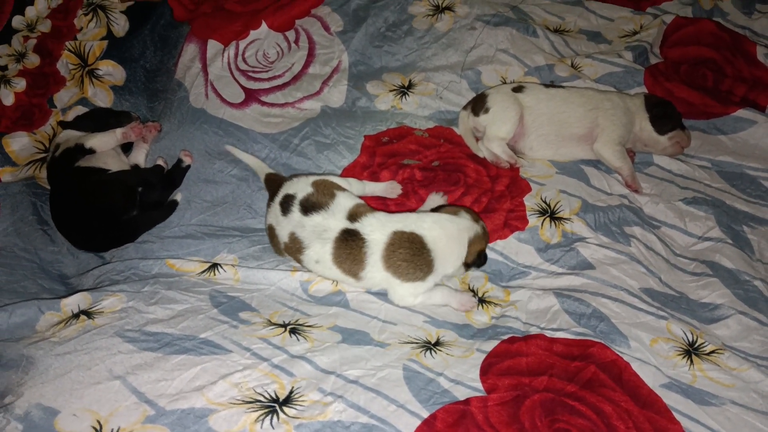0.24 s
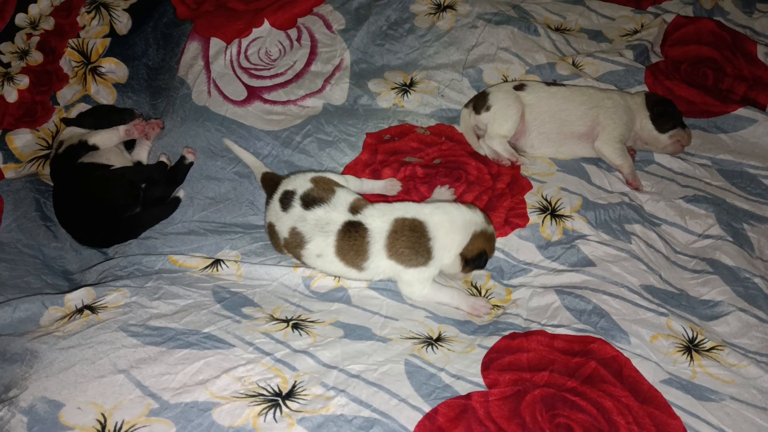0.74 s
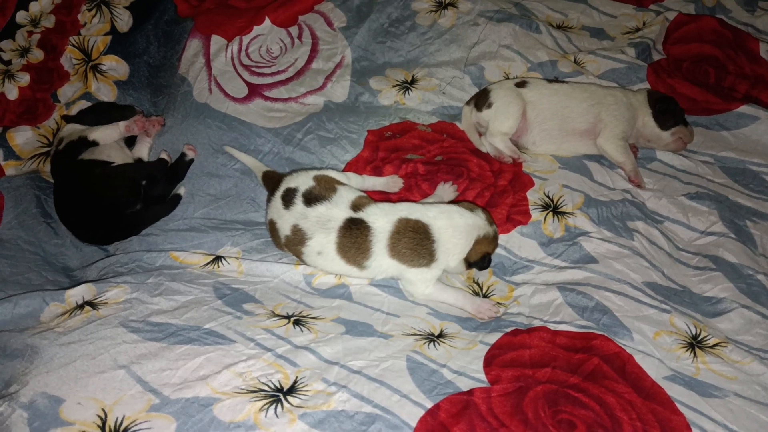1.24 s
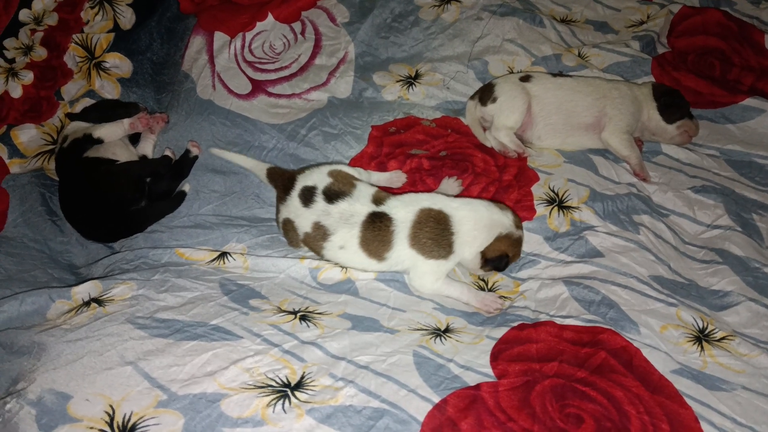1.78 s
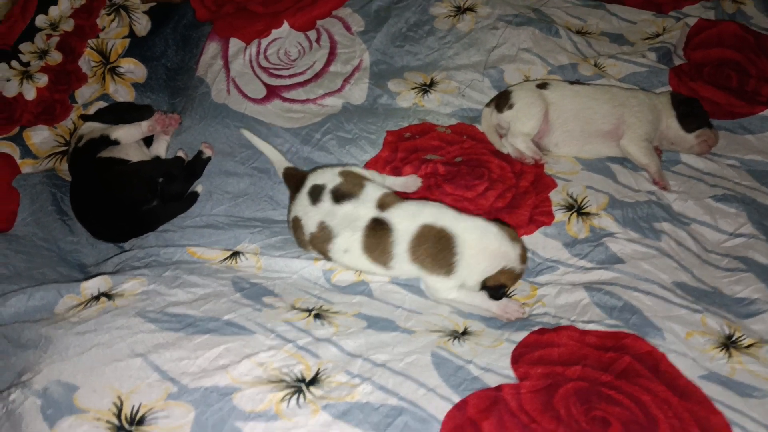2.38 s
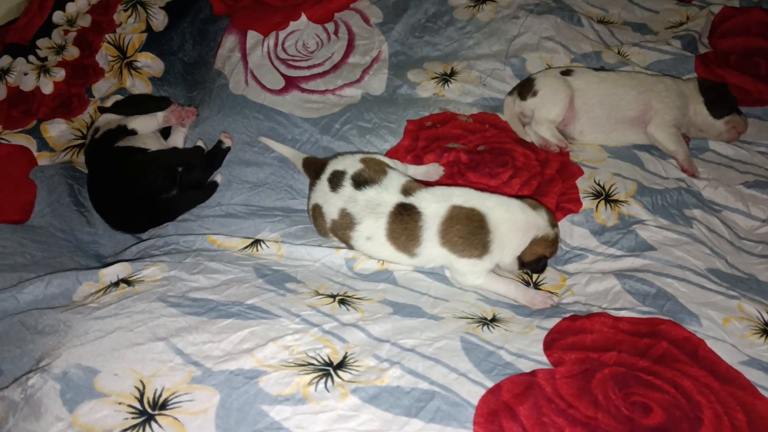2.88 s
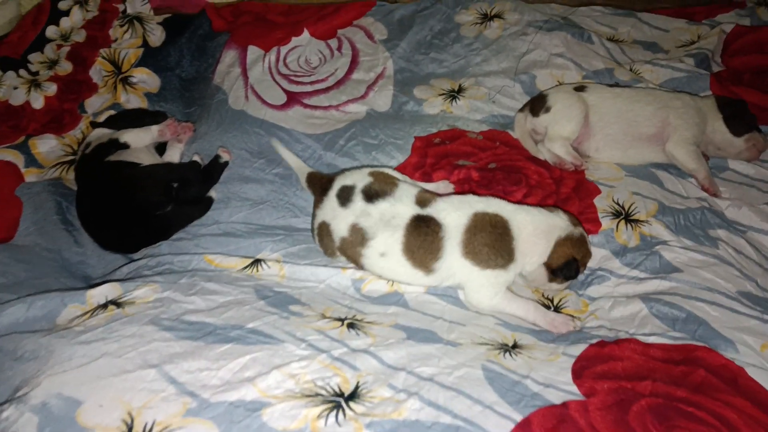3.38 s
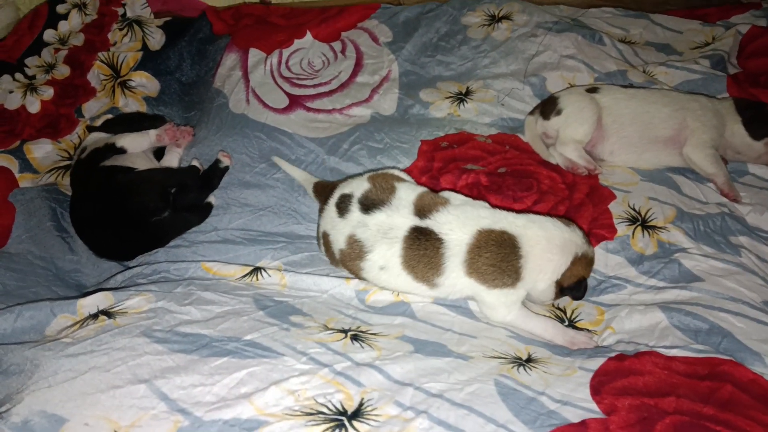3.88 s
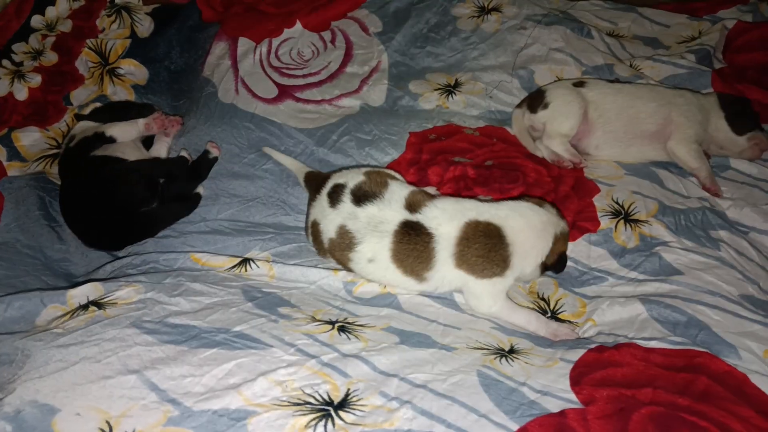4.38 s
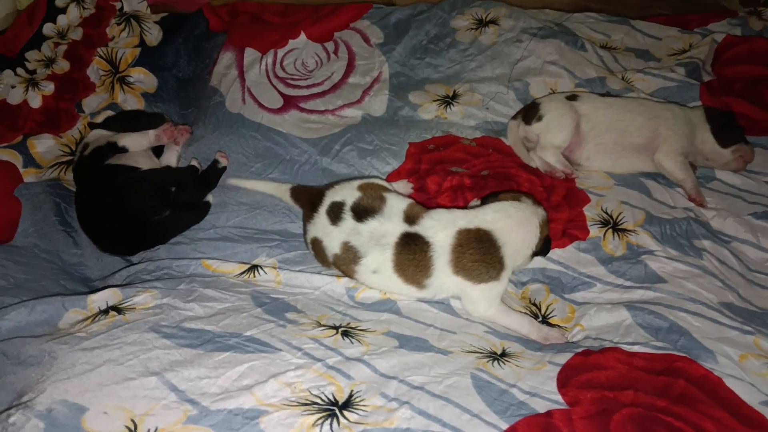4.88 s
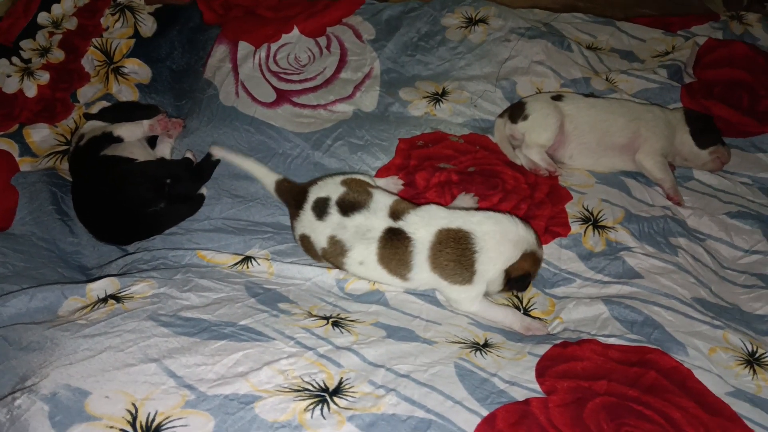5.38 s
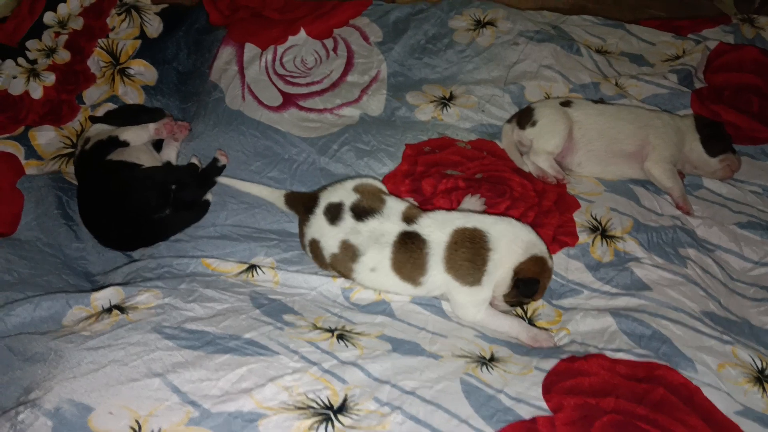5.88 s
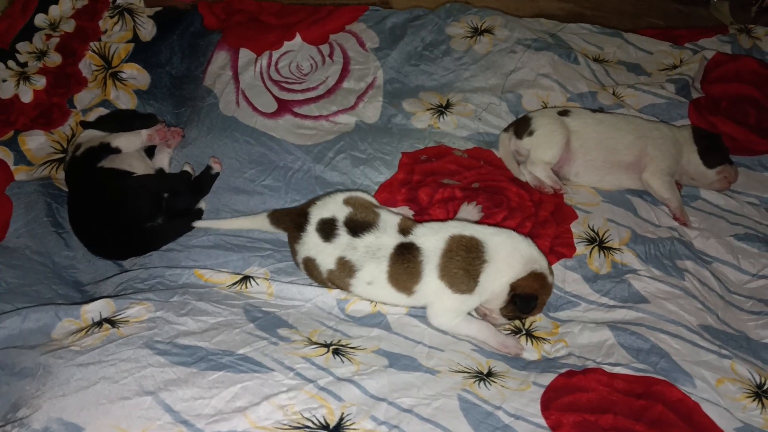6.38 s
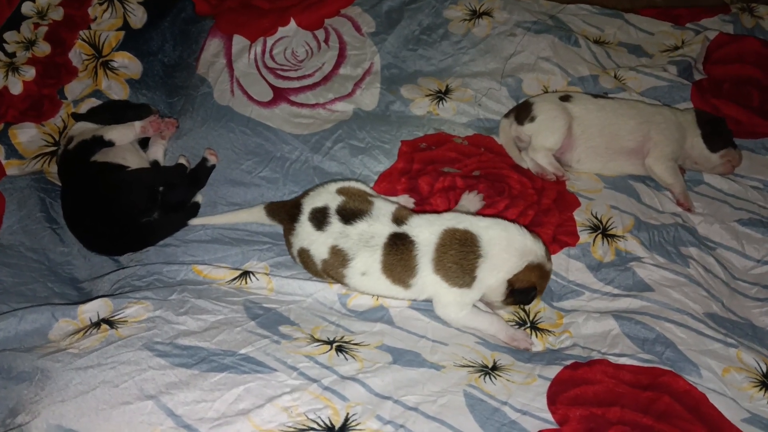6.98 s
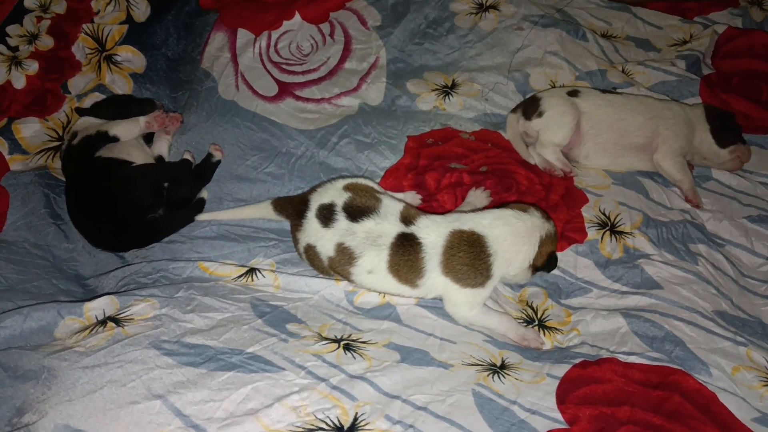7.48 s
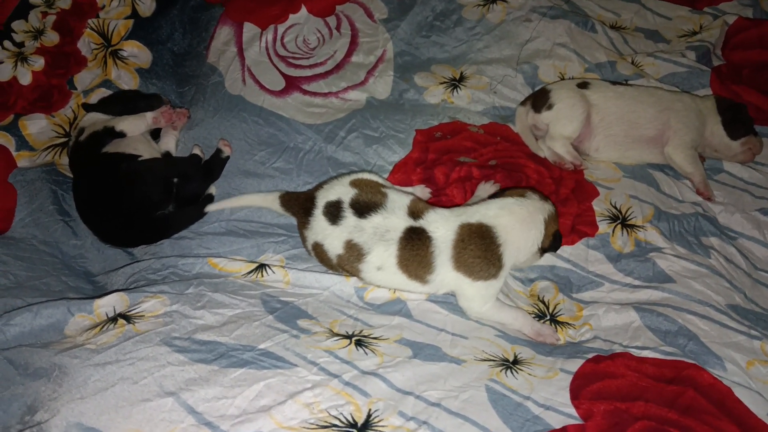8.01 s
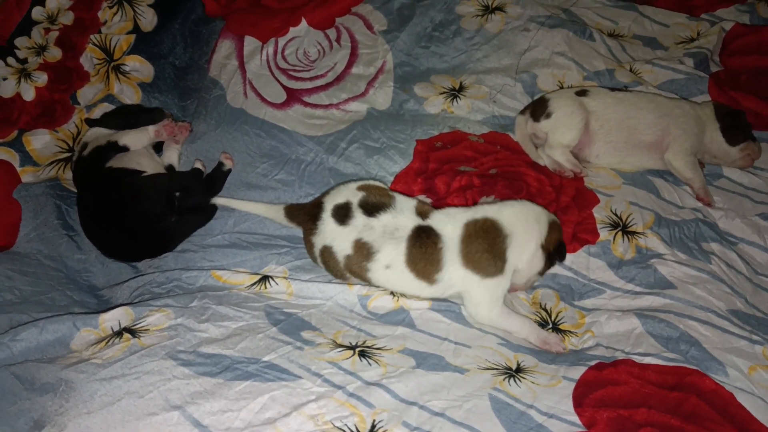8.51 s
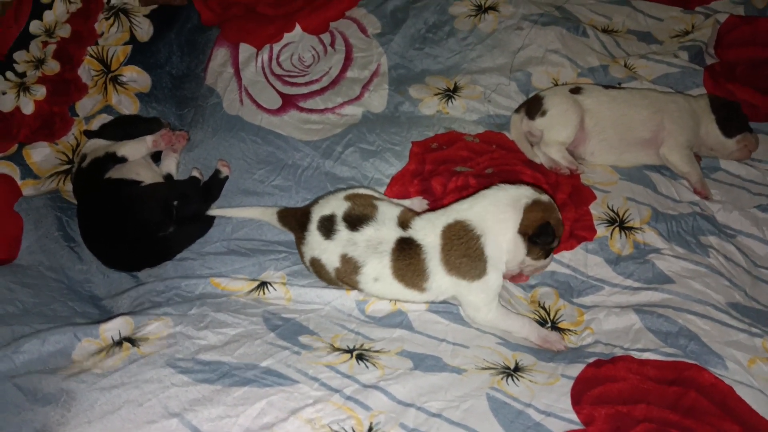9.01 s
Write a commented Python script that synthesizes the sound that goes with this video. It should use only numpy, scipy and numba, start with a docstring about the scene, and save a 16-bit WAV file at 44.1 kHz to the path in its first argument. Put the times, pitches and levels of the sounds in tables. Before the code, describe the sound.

Close up in a quiet room, a newborn puppy whimpers in thin, gliding squeaks that flip suddenly higher. Early on it grunts and sneezes softly, pauses, then cries almost continually with small gaps. Bed sheets hiss and snap faintly, the mattress thuds softly, and a wall clock rattles once a second farther off. The last half second becomes a hoarse, rough cry. Near stereo microphone, short room echo.

```python
"""A newborn puppy, near a two-port microphone, crawls on a bed in a quiet room and whimpers: gliding sine partials
that jump between registers, one sneeze of shaped noise, and at last a hoarse cry of uneven slaps ringing in the mouth.
Farther off a wall clock ticks, a rattle in its case. Around the puppy the sheet hisses and snaps and
the mattress thuds softly, both made of filtered noise and clicks over steady room tone."""
import sys
import numpy as np
from scipy import signal
from scipy.fft import rfft, irfft, next_fast_len
from scipy.io import wavfile
from scipy.ndimage import uniform_filter1d
from numba import njit

SR = 44100
rng = np.random.default_rng(int(sys.argv[2]) if len(sys.argv) > 2 else 0)


def persist_wave(psi):
    """Save psi, clipped to +-1, as 16-bit WAV."""
    counts = np.round(np.clip(psi, -1, 1) * 32767).astype(np.int16)
    wavfile.write(sys.argv[1], SR, np.atleast_2d(counts).T)


N = 407925

# Levels hold before a sound is placed; the colours of hiss and voice are relative.
# Air of the room. Each row: frequency in Hz, colour in dB per Hz.
ROOM_AIR = [(18, -48.5), (30, -7), (125, 0), (388, -10), (803, -16), (1090, -11), (2090, -20), (2420, -16),
            (3810, -29), (5690, -20), (6610, -35.5), (7690, -29), (10800, -26.5), (12100, -38.5),
            (15700, -63.5), (22000, -120)]
ROOM_AIR_DB = -78
# Faint steady bands in the air. Each row: centre in Hz, width of each of two passes in Hz, level in dB.
AIR_WHISTLES = [(2490, 88, -94), (5755, 220, -86), (7520, 400, -93)]
# Whimpered notes; where two touch, the voice jumps between registers.
# Each note has rows: time in seconds, pitch in Hz, level in dB, mouth opening 0-1.
NOTES = [
    [(0.033, 680, -52.5, 0.36), (0.055, 690, -45, 0), (0.072, 898, -38.5, 0), (0.095, 920, -35, 0.44),
     (0.119, 1010, -40, 0.37), (0.135, 1203, -42.5, 0.4)],
    [(0.139, 1695, -43.5, 0.43), (0.2, 1750, -46.5, 0.56), (0.25, 1758, -49.5, 0.48),
     (0.29, 1750, -45, 0.5), (0.35, 1673, -46.5, .3), (0.39, 1750, -51, 0.21), (0.436, 1659, -42.5, 0.17),
     (0.481, 1631, -45, 0.17), (0.495, 1534, -48, 0)],
    [(0.742, 298.6, -57, 0), (0.755, 330, -52, 0.07), (0.766, 452, -38.5, 0.32), (0.782, 579, -35.5, 0.37),
     (0.787, 490, -39.5, 0.4), (0.792, 461, -34, 0), (0.803, 480, -67, 0)],
    [(1.683, 736, -55.5, 0.36), (1.711, 628, -43, 0.26), (1.74, 859, -36.5, 0.17), (1.765, 834, -37, 0.17),
     (1.803, 631, -41.5, 0.2), (1.831, 525, -45, 0.47), (1.9, 600, -42.5, 0.3), (1.925, 661, -41, 0.22),
     (1.945, 716, -37.5, 0.42), (1.993, 732, -44, 0.33), (2.02, 658, -47, 0)],
    [(2.205, 534, -52, 0.7), (2.227, 557, -44.5, 0), (2.27, 914, -37.5, 0.22), (2.3, 897, -29.5, 0.39),
     (2.32, 885, -34.5, 0.2), (2.34, 740, -40.5, 0.67), (2.375, 571, -43.5, 0.45), (2.39, 387, -49, 0.2)],
    [(2.612, 795, -62, 0), (2.637, 739, -51.5, 0), (2.675, 1003, -43.5, 0.29), (2.706, 1184, -49.5, 0.45)],
    [(2.71, 1475, -44, 0.4), (2.774, 1630, -44.5, 0.5), (2.81, 1656, -42, 0.35), (2.84, 1607, -45, 0.48),
     (2.9, 1617, -39.5, 0.45), (2.948, 1505, -37.5, 0.36), (3.002, 1555, -38, 0.42), (3.02, 1327, -43.5, 0)],
    [(3.268, 602, -55, 0.16), (3.288, 661, -38.5, 0.11), (3.356, 887, -31.5, 0.1), (3.4, 915, -34, 0.59),
     (3.461, 1100, -37.5, 0.58), (3.505, 1168, -36.5, 0.77), (3.528, 1297, -28, 0.25)],
    [(3.532, 1680, -35, 0.83), (3.577, 1683, -27.5, 0.67), (3.605, 1686, -45.5, 1), (3.63, 1654, -50, 0.9),
     (3.655, 1664, -36.5, 0.6), (3.69, 1693, -41, 0.64), (3.715, 1667, -38, 0.6),
     (3.733, 1536, -40.5, 0.68), (3.773, 1620, -55, 0.8)],
    [(3.777, 853, -42, 0.12), (3.787, 818, -32.5, 0.17), (3.81, 810, -85, 0.5)],
    [(4.007, 670, -57.5, 0), (4.048, 578, -36, 0), (4.09, 880, -40.5, 0.05), (4.147, 985, -43.5, 0.32),
     (4.205, 1061, -42.5, 0.55), (4.228, 1144, -37.5, 0.33)],
    [(4.232, 1474, -41, 0), (4.28, 1518, -42, 0.3)],
    [(4.284, 896, -42, 0.5), (4.31, 708, -48, 0.04)],
    [(4.52, 581, -72, 0.16), (4.566, 760, -42, 0.22), (4.59, 938, -37, 0.32), (4.63, 899, -39, 0.23),
     (4.665, 829, -40.5, 0.28), (4.689, 759.5, -41.5, 0.55), (4.712, 590.5, -44.5, 0.66),
     (4.726, 515, -47.5, 0.87)],
    [(4.965, 413, -58, 0), (4.991, 480, -39, 0.25), (5.041, 940, -28, 0.07), (5.06, 983, -30.5, 0.39),
     (5.093, 863, -28.5, 0), (5.12, 827, -40.5, 0.48), (5.15, 740, -35.5, 0.32), (5.163, 521, -38, 0.33),
     (5.2, 423.5, -37, 0.23), (5.238, 367, -42.5, 0), (5.255, 330, -38.5, 0.14)],
    [(5.44, 499.4, -41, 0.36), (5.478, 572, -37, 0.07), (5.495, 770, -39.5, 0.01), (5.502, 909, -26, 0.13),
     (5.54, 948, -30, 0.48), (5.591, 939, -39, 0.45), (5.615, 861, -34.5, 0.31), (5.645, 783, -39.5, 0.23),
     (5.715, 779, -46, 0.28)],
    [(5.735, 787.4, -39, 0.42), (5.791, 802.7, -40, 0.03), (5.815, 822, -39, 0.4)],
    [(6.038, 660, -58.5, 0.2), (6.06, 593, -44.5, 0), (6.098, 856, -35.5, 0.05), (6.15, 873, -37, 0.42),
     (6.19, 1105, -46, 0.26), (6.215, 998, -39.5, 0.35), (6.28, 989, -39.5, 0.29), (6.305, 1085, -49, 0.78),
     (6.345, 991, -35, 0.25), (6.37, 1054, -43.5, 0.4), (6.39, 1183, -37, 0.32)],
    [(6.394, 1730, -41.5, 0.08), (6.412, 1662, -40, 0.35), (6.562, 1529, -47.5, 0.8),
     (6.594, 1577, -37.5, 0.2)],
    [(6.599, 1165, -46, 0.01), (6.625, 724, -57, 0)],
    [(6.885, 844, -56, 0), (6.939, 1038, -40.5, 0), (6.975, 1036, -41, 0.3), (6.986, 1149, -39, 0.21)],
    [(6.99, 1512, -39.5, 0.36), (7.01, 1785, -46, 0.06), (7.04, 1642, -44.5, 0), (7.118, 1896, -41.5, 0.3),
     (7.196, 1941, -42.5, 0.04)],
    [(7.2, 1770, -43, 0.33), (7.236, 1662, -40, 0.25), (7.29, 1730, -41.5, 0.57),
     (7.325, 1788, -36.5, 0.34), (7.345, 1699, -39.5, 0.47), (7.421, 1685, -34.5, 0.48),
     (7.462, 1613, -39.5, 0.62)],
    [(7.466, 1450, -42, 0.01), (7.508, 1566, -45, 0.1), (7.578, 1583, -50.5, 0), (7.61, 1485, -37, 0.31)],
    [(7.619, 1613, -27, 0.62), (7.633, 1752, -31, 0.66), (7.673, 1760, -36.5, 0.68),
     (7.7, 1756, -37.5, 0.66), (7.735, 1740, -41.5, 0.6), (7.754, 1775, -31, 0.23)],
    [(7.758, 1530, -49.5, 0.53), (7.77, 1154, -47.5, 0.23), (7.778, 1070, -63, .2)],
    [(7.99, 872, -47.5, 0.08), (8.04, 951, -49, 0.77)],
    [(8.044, 1330, -42.5, 0.25), (8.07, 1712, -37, 0.4), (8.12, 1905, -38.5, 0), (8.184, 1867, -45, 0.02),
     (8.221, 1945, -43, 0.1)],
    [(8.225, 1705, -39.5, 0.32), (8.345, 1643, -40, 0.52), (8.392, 1759, -37, 0.77),
     (8.425, 1666, -37.5, 0.73), (8.452, 1637, -34.5, 0.75), (8.478, 1648, -42.5, 0.2),
     (8.564, 1606, -39, 0.35), (8.612, 1605, -41, 0.86)],
]
# How each note favours its overtones. Each row: second partial in dB, third in dB, higher ones in dB.
OVERTONES = [(-1.5, -7.5, -0.5), (7, -0.5, 9), (1, 1.5, 4), (0.5, 1, -5.5), (-1.5, 1.5, -4),
             (4.5, -2, -2.5), (-1.5, -2, 12.5), (-1, -1.5, 2), (1, 4.5, 1), (3.5, -3, 8), (9.5, 7, -12),
             (9, -2, -4), (2, -1, -1), (0, -3, -17), (-3, -4.5, 3), (-3, -1.5, -0.5), (-1, -4, 13.5),
             (3, -4, -9), (-3, -4.5, 4), (-9, 1, 4.5), (5, -2, 1), (1, 2.5, 0.5), (5, -18.5, -12),
             (22, -2, 6.5), (5.5, -13, 11), (7, -7, 3), (-3.5, -3, -4), (13.5, -8, 5), (7.5, -9.5, 11)]
# Closed mouth, heard through the nose. Each row: frequency in Hz, gain in dB.
NOSE = [(300, -15), (550, -8.5), (900, 9), (1200, 7.5), (1700, 2), (2200, -7), (2700, -31), (3400, -19.5),
        (4500, -52), (8000, -55), (12000, -74.5)]
# Open mouth. Each row: frequency in Hz, gain in dB before THROAT_SHARE.
THROAT = [(590, -24.5), (1000, -13), (2330, -6), (3800, -18.5), (4950, -9.5), (6460, -21.5), (7720, -2),
          (12100, -38.5), (15700, -74), (22000, -120)]
THROAT_SHARE = 0.17   # how strongly the open mouth colours the partials
RESONANCES_RISE = 0.49   # share by which the nose resonances climb as the mouth opens fully
FALL_CLOSED_DB, FALL_OPEN_DB = -9.5, -1   # from one partial to the next
WIDE_HZ, WIDE_WIDTH_HZ, WIDE_DB = 5060, 210, 20   # the widest gape rings here
SOFT_BELOW_DB, SOFT_FALL_DB = -45, 0.1   # under this level each overtone loses more, for every dB softer
# Slow random wavering in level, of all partials together and of each overtone.
WAVER_DB, OVERTONE_WAVER_DB = 1.41, 2.5
# Stretches where the folds shake. Each row: start in seconds, end in seconds, added roughness 0-1.
SHAKY = [(.742, .762, .3), (.782, .805, .5), (1.68, 1.715, .5), (2.0, 2.025, .4), (2.32, 2.39, .25),
         (4.24, 4.315, .35), (4.52, 4.575, .45), (4.7, 4.73, .4), (5.105, 5.17, .2), (6.035, 6.075, .45),
         (6.59, 6.63, .5), (6.89, 7.03, .25), (7.752, 7.78, .5)]
# The vibration repeats only every third cycle. One row: start in seconds, end in seconds,
# side lines a third of the pitch away in dB, side lines two thirds away in dB.
THIRDS = (6.4, 6.51, -15.5, -21)
# Where the head turns. Each row: time in seconds, left minus right in dB.
HEAD = [(0.0, -1.5), (.8, 4), (1.6, -0.5), (5.618, 2), (5.871, -0.5), (6.26, 3), (6.85, 1.5), (7.311, -1.5),
        (8.01, 1.5), (8.401, -2), (8.68, 1), (9.25, 5.5)]
# Case of the clock. Each row: centre in Hz, width of each of two passes in Hz, gain in dB.
CLOCK_CASE = [(1390, 350, -15), (2100, 360, -1), (3214, 240, -4), (3870, 320, -2.5), (4320, 400, -3.5),
              (5000, 500, -8), (7050, 440, -7), (7600, 650, -7)]
FIRST_TICK_S, TICK_UNEVEN_S = .3105, 0.0006
TICK_DB, TICK_SPREAD_DB = -43.5, 1.0   # drive of the rattle, before the case
TICK_SWELL_S, TICK_RATTLE_S = .022, .046   # the rattle builds up and dies
# Air of the sneeze. Each row: frequency in Hz, colour in dB per Hz.
SNEEZE_AIR = [(180, -44), (300, -24), (500, 2.5), (736, -18), (1080, -16.5), (1830, -23.5), (1980, -16.5),
              (4930, -18), (6410, -26.5), (8460, -16.5), (12100, -22), (15700, -28), (22000, -120)]
SNEEZE_S, SNEEZE_DB, SNEEZE_RISE_S, SNEEZE_FADE_S = .788, -47, 0.011, 0.054
# Creaky starts and ends of whimpers; a row that ends before it starts is silent.
# Each row: start in seconds, end in seconds, base rate in slaps per second, level in dB before the swell.
CREAKS = [(1.678, 1.717, 420, -51), (4.712, 4.745, 330, -47), (4.511, 4.59, 500, -44),
          (4.954, 5.4, 350, -55.5), (4.255, 4.31, 475, -51), (5.705, 5.742, 1100, -37),
          (5.79, 5.84, 280, -44.5), (6.7, 6.078, 400, -53.5), (6.887, 6.942, 320, -42),
          (6.971, 7.029, 220, -58), (8.01, 8.04, 310, -44)]
NOSTRIL_S, NOSTRIL_LENGTH_S = 1.91, .135   # middle and length
NOSTRIL_HZ, NOSTRIL_WIDTH_HZ, NOSTRIL_DB = 4950, 450, -74
# Fibres of the sheet snap. Each row: time in seconds, strength in dB before a common lift.
SNAPS = [(2.2303, -65), (4.3566, -55), (5.3787, -65), (5.7549, -61), (5.8551, -62), (5.9244, -59),
         (6.099, -73), (6.6144, -59), (6.79, -64.5), (7.2614, -85), (7.4513, -80)]
# Sheet sliding under the body. Each row: start in seconds, swell in seconds, fade in seconds, peak in dB.
SLIDES = [(2.29, 0.086, 0.066, -63), (2.42, 0.92, 0.34, -61), (3.5, 0.33, 0.19, -61.5),
          (4.349, 0.42, 0.18, -70.5), (5.67, 0.075, .2, -64.5)]
SLIDE_RANGE_DB = 10   # how far the level climbs in a swell and falls in a fade
# Hiss of the sheet. Each row: frequency in Hz, colour in dB per Hz.
SHEET = [(1180, -22), (2000, -0.5), (2760, -6), (2980, -3), (3240, -14.5), (5740, -4), (6180, -19),
         (7750, -2.5), (9140, -10.5), (11000, -13), (12100, -58), (15700, -74), (22000, -120)]
SHEET_TOP_DB = -90   # the hardest slide also hisses above 11 kHz
# Weight shifting on the mattress. Each row: middle in seconds, length in seconds, peak in dB.
THUDS = [(4.15, 0.17, -81), (4.57, 0.32, -67), (4.987, 0.11, -68.5), (5.332, 0.31, -70), (5.825, 0.2, -65),
         (6.157, 0.11, -77), (7.016, 0.11, -71.5), (9.153, 0.16, -73.5)]
# Mouth clicks. Each row: time in seconds, drive in dB, duller part against the bright one in dB.
SMACKS = [(3.7933, -41, 13.5), (4.57, -44, 5.5), (4.701, -53, 0.5), (5.785, -38.5, 11.5),
          (7.6202, -40.5, 1), (7.772, -71.5, 3), (8.275, -51.5, -14)]
# The hoarse cry. Each row: time in seconds, level in dB, jaw width 0-1.
RASP = [(8.608, -42, 0.99), (8.66, -37.5, 0.96), (8.72, -34.5, 0.84), (8.78, -35, 0.51),
        (8.86, -32.5, 0.43), (8.89, -33.5, 0.42), (8.93, -32.5, 0.34), (8.96, -34, 0.26),
        (9.0, -34.5, 0.12), (9.055, -35, 0.28), (9.08, -32, 0.1), (9.11, -32.5, 0.27), (9.135, -33.5, 0),
        (9.155, -36.5, 0.2), (9.175, -39, 0.03), (9.215, -39.5, 0.23), (9.225, -35.5, 0),
        (9.25, -34.5, 0.5)]
# Its folds lock into a steady beat twice and tumble in between.
# Each row: time in seconds, base rate in slaps per second, irregularity 0-1.
FOLDS = [(8.6, 300, .45), (8.83, 290, .4), (8.86, 328, .06), (8.885, 348, .04), (8.91, 338, .1),
         (8.93, 350, .1), (8.96, 325, .3), (9.04, 290, .3), (9.062, 358, .08), (9.08, 340, .01),
         (9.11, 331, .01), (9.125, 300, .45), (9.14, 190, .6), (9.25, 260, .55)]
# Resonances of the cry. Each row: centre in Hz before the tongue moves it, width in Hz before widening,
# gain in dB with the jaw wide, gain in dB with it narrow.
MOUTH = [(330, 210, -20.5, -9.5), (740, 270, -17, -17), (948, 153, -9, -2), (1330, 300, -7.5, -6.5),
         (1850, 420, 6.5, -12.5), (2368, 160, -7, 2), (2672, 126, -1, -4), (3230, 250, -18, -1),
         (3650, 170, -2.5, -17), (4060, 280, -14, -14.5), (4800, 500, -12, -5), (5990, 360, -53, -7.5),
         (7550, 650, -21, -9), (8840, 440, -13.5, -27), (10400, 720, -17.5, -23), (12500, 520, -43, -28)]
# The tongue moves the lower resonances. Each row: time in seconds, factor on their frequency.
TONGUE = [(8.608, 0.96), (8.65, 0.98), (8.72, 1.022), (8.79, 0.92), (8.86, 0.94), (9.05, 0.99),
          (9.09, 1.005), (9.13, 0.94), (9.2, 0.93), (9.25, 1.18)]
TONGUE_BELOW_HZ = 3900
BREATHY = .13   # steady air, grows with the square of irregularity
CRY_TOP_HZ, CRY_HOLLOW_HZ = 11500, 6280   # low-pass; a partly cancelled band
# Echo of the room. Each row: frequency in Hz, time in seconds to fall 60 dB, before the common shortening.
ROOM_T60 = [(250, 0.089), (600, 0.34), (1500, 0.31), (4000, 0.51), (8000, 0.36), (15000, 0.031)]
CUTOFF_HZ = 16100


def from_db(db):
    """Decibels to gain."""
    return 10 ** (np.asarray(db) / 20)


def rms_one(x):
    """Scales to rms 1."""
    return x / np.sqrt(np.mean(x ** 2) + 1e-30)


def at_hz(points, hz):
    """Reads a spectrum on a log-frequency axis."""
    point_hz, value = np.transpose(points)
    return np.interp(np.log(np.maximum(hz, 1)), np.log(point_hz), value)


def filtered(x, order, hz, kind="low"):
    """Butterworth low-pass, high-pass or band-pass."""
    return signal.sosfilt(signal.butter(order, hz, kind, fs=SR, output="sos"), x)


def resonance(x, hz, width_hz):
    """Two-pole peak of gain 1."""
    r = np.exp(-np.pi * width_hz / SR)
    feedback = [1, -2 * r * np.cos(2 * np.pi * hz / SR), r * r]
    return signal.lfilter(np.array([1, 0, -1]) * (1 - r * r) / 2, feedback, x)


def resonance_twice(x, hz, width_hz):
    """The same peak in two passes, for steeper sides."""
    return resonance(resonance(x, hz, width_hz), hz, width_hz)


def coloured(x, spectrum):
    """Gives a signal a spectrum; rms 1."""
    size = next_fast_len(x.shape[-1] + 2048)
    gain = from_db(at_hz(spectrum, np.fft.rfftfreq(size, 1 / SR)))
    return rms_one(irfft(rfft(x, size) * gain, size)[..., :x.shape[-1]])


def drift(rate_hz, size=N):
    """Slow chance: noise twice through a one-pole low-pass; rms 1."""
    r = np.exp(-2 * np.pi * rate_hz / SR)
    settle = 9000
    noise = rng.standard_normal(size + settle)
    return rms_one(signal.lfilter([1], [1, -2 * r, r * r], noise)[settle:])


def wide_noise(alike, size=N):
    """Two white channels that share a part."""
    mid, side = rng.standard_normal((2, size))
    alike = np.clip(alike, 0, 1)
    return np.sqrt(1 + alike) * mid + np.sqrt(1 - alike) * side * [[1], [-1]]


def played(rows, fade_s=0.0019):
    """Sample numbers, a fade at both ends and the columns of a table, sample by sample."""
    s, *columns = np.transpose(rows)
    at = np.arange(int(s[0] * SR), min(int(s[-1] * SR), N))
    fade = np.clip(np.minimum(at / SR - s[0], s[-1] - at / SR) / fade_s, 0, 1)
    return at, fade, [np.interp(at / SR, s, c) for c in columns]


def stretch(t, start, end, edge_s):
    """1 between start and end, with straight ramps inside both edges."""
    return np.clip(np.minimum(t - start, end - t) / edge_s, 0, 1)


def slaps(per_s, irregular):
    """Vocal folds slap shut at uneven gaps and strengths, each with a puff of air."""
    size = len(per_s)
    cycle = np.cumsum(per_s * np.exp(.8 * irregular * drift(250, size)) / SR)
    closing = np.diff(np.floor(cycle), prepend=0) * from_db(3.2 * irregular * drift(300, size))
    puff = signal.lfilter([1], [1, -.97], closing) * rng.standard_normal(size)
    return closing + 0.1 * irregular * puff


def room_tone():
    """Steady air: coloured noise with a few faint narrow bands that waver."""
    bands = 0
    for hz, width_hz, db in AIR_WHISTLES:
        band = rms_one(resonance_twice(wide_noise(0.064), hz, width_hz))
        bands = bands + from_db(db + 1.7 * drift(10)) * band
    return from_db(ROOM_AIR_DB) * coloured(wide_noise(0.24), ROOM_AIR) + bands


def sung_as_one(notes):
    """Joins notes that touch into whole calls."""
    calls = [list(notes[0])]
    for note in notes[1:]:
        gap_s = note[0][0] - calls[-1][-1][0]
        if gap_s < .007:
            calls[-1] += note
        else:
            calls.append(list(note))
    return calls


def rounded(hz, turn_s):
    """Muscles round every turn of the pitch; register jumps stay sudden."""
    step = np.diff(np.log(hz), prepend=np.log(hz[0]))
    jump = step * (np.abs(step) > 22 / SR)
    glide = uniform_filter1d(step - jump, int(turn_s * SR), mode="nearest")
    return hz[0] * np.exp(np.cumsum(jump + glide))


def partial_gains(k, hz, opening, favoured_db):
    """Balance of the partials between nose and open mouth; their total power stays 1."""
    closed_db = at_hz(NOSE, k * hz / (1 + RESONANCES_RISE * opening)) + FALL_CLOSED_DB * (k - 1)
    open_db = THROAT_SHARE * at_hz(THROAT, k * hz) + FALL_OPEN_DB * (k - 1)
    gape = np.exp(-((k * hz - WIDE_HZ) / WIDE_WIDTH_HZ) ** 2)
    open_db = open_db + WIDE_DB * opening ** 1.6 * gape
    gains = from_db(closed_db + opening ** 1.12 * (open_db - closed_db) + favoured_db)
    gains = gains * np.clip((12200 - k * hz) / 400, 0, 1)   # nothing above 12.2 kHz
    return gains / np.sqrt(np.sum(gains ** 2, axis=0))


def whimpers():
    """Sine partials through nose or mouth; the folds shake most where a call starts, leaps or ends."""
    out, k = np.zeros(N), np.arange(1, 11)[:, None]
    notes = [[(*row, *db) for row in note] for note, db in zip(NOTES, OVERTONES)]
    for rows in sung_as_one(notes):
        at, fade, columns = played(rows, fade_s=0.0045)
        hz, level_db, opening, second_db, third_db, higher_db = columns
        t, size = at / SR, len(at)
        hz, opening = rounded(hz, turn_s=0.015), np.clip(opening, 0, 1)
        phase = 2 * np.pi * np.cumsum(hz * (1 + 0.0041 * drift(32, size))) / SR

        from_edge_s = np.minimum(at - at[0], at[-1] - at) / SR
        leap = uniform_filter1d(np.abs(np.gradient(np.log(hz))) * SR, int(0.053 * SR))   # log pitch per s
        rough = 0.0087 + 0.29 * np.exp(-from_edge_s / 0.0077) + np.minimum(0.0011 * leap, .4)
        rough = rough + sum(r * stretch(t, start, end, .01) for start, end, r in SHAKY)

        favoured_db = second_db * (k == 2) + third_db * (k == 3) + higher_db * (k > 3)
        favoured_db = favoured_db + SOFT_FALL_DB * (k - 1) * np.minimum(level_db - SOFT_BELOW_DB, 0)
        gains = partial_gains(k, hz, opening, favoured_db)
        voice = 0
        for n, gain in enumerate(gains, 1):
            waver = from_db(OVERTONE_WAVER_DB * (n > 1) * drift(25, size))
            shake = 1 + rough * (drift(110, size) + 1j * drift(110, size))   # strength and phase
            voice = voice + gain * waver * np.imag(shake * np.exp(1j * n * phase))
        voice = from_db(level_db + WAVER_DB * drift(11, size)) * voice

        start, end, near_db, far_db = THIRDS
        uneven = from_db(near_db) * np.cos(phase / 3) + from_db(far_db) * np.cos(2 * phase / 3)
        out[at] += np.sqrt(2) * fade * voice * (1 + 2 * stretch(t, start, end, 0.012) * uneven)
    return out


def clock():
    """Once a second the hand jumps and rattles for some hundredths of a second in the plastic case."""
    rattle = np.zeros(N) + 1e-18
    after = np.arange(int(.1 * SR))
    swell = np.minimum(0.59 + after / (TICK_SWELL_S * SR), 1.4)
    dying = np.exp(-(after / (TICK_RATTLE_S * SR)) ** 1.7)
    for second in range(9):
        s = FIRST_TICK_S + second + TICK_UNEVEN_S * rng.standard_normal()
        drive_db = TICK_DB + TICK_SPREAD_DB * rng.standard_normal()
        touching = rng.random(len(after)) < 3500 / SR   # about 3500 touches per s
        touches = rms_one(rng.standard_normal(len(after)) * touching)
        rattle[round(s * SR) + after] += from_db(drive_db) * touches * swell * dying
    case = sum(from_db(db) * resonance_twice(rattle, hz, width_hz) for hz, width_hz, db in CLOCK_CASE)
    return filtered(case - .9 * resonance(case, 6050, 1100), 5, 8800)   # a hollow band, dull top


def sneeze():
    """A burst of air from the nose after the grunt: it swells quickly and dies away."""
    after = np.arange(int(.2 * SR)) / SR
    rise = np.minimum(after / SNEEZE_RISE_S, 1) ** 2
    fall = np.exp(-(np.maximum(after - SNEEZE_RISE_S, 0) / SNEEZE_FADE_S) ** 2)
    air = coloured(rng.standard_normal(len(after)), SNEEZE_AIR)
    out = np.zeros(N)
    out[int(SNEEZE_S * SR) + np.arange(len(after))] = from_db(SNEEZE_DB) * rise * fall * air
    return out


def creaks():
    """Short swelling runs of soft, quickening slaps through a nearly closed mouth."""
    out = np.zeros(N)
    for start, end, per_s, level_db in CREAKS:
        at, _, (rate,) = played([(start, per_s), (end, per_s)])
        train = slaps(rate * np.linspace(.85, 1.2, len(at)), .45)
        muffled = 1.2 * resonance_twice(train, 296, 110)
        muffled = muffled + 2.1 * resonance_twice(train, 915, 790)
        muffled = muffled + 0.22 * resonance_twice(train, 1750, 230)
        out[at] += from_db(level_db) * np.hanning(len(at)) * rms_one(muffled)
    return filtered(out, 6, 2000)


def nostril():
    """Air hisses thinly in a nostril: a narrow band of noise during one whimper."""
    shape = np.exp(-(2 * (np.arange(N) / SR - NOSTRIL_S) / NOSTRIL_LENGTH_S) ** 4)
    air = resonance_twice(rng.standard_normal(N), NOSTRIL_HZ, NOSTRIL_WIDTH_HZ)
    return from_db(NOSTRIL_DB) * shape * rms_one(air)


def snaps():
    """Fibres snap: single impulses ring briefly in a bright, broad resonance."""
    clicks = np.zeros(N) + 1e-18
    s, strength_db = np.transpose(SNAPS)
    clicks[(s * SR).astype(int)] = from_db(strength_db + 17.5)
    return resonance_twice(clicks, 10400, 2500)


def patchy(x, patchy_db):
    """Each of five bands flickers by itself."""
    edges, out = [20, 2500, 4500, 6500, 9000, 16000], 0
    for band in zip(edges, edges[1:]):
        out = out + from_db(patchy_db * drift(16)) * filtered(x, 2, band, "band")
    return out


def bedding():
    """Fine hiss of the sliding sheet and low pushes through the mattress."""
    t, sliding, pushing = np.arange(N) / SR, 0, 0
    for start, swell_s, fade_s, peak_db in SLIDES:
        peak_s = start + swell_s
        away = np.maximum((peak_s - t) / swell_s, (t - peak_s) / fade_s)   # 0 at the peak
        ends = np.clip((t - start) / 0.06, 0, 1) * np.clip(3 - 2 * away, 0, 1)
        sliding = sliding + from_db(peak_db - SLIDE_RANGE_DB * away) * ends
    for s, length_s, peak_db in THUDS:
        pushing = pushing + from_db(peak_db) * np.exp(-(2 * (t - s) / length_s) ** 4)
    hiss = sliding * patchy(coloured(wide_noise(0.19), SHEET), patchy_db=1.0)
    top = rms_one(filtered(wide_noise(.2), 4, [11000, 15500], "band"))
    top = from_db(SHEET_TOP_DB + 4 * drift(15)) * (sliding / sliding.max()) ** 3 * top
    low = rms_one(filtered(wide_noise(.75), 3, [42, 80], "band"))
    return hiss + top + pushing * low


def smacks():
    """Wet mouth clicks: a millisecond or so of crackle, bright and duller parts."""
    bright, dull = np.zeros((2, N)) + 1e-18
    after = np.arange(150)
    for s, drive_db, dull_db in SMACKS:
        crackle = rng.standard_normal(len(after)) * np.exp(-after / 60.0)
        bright[round(s * SR) + after] += from_db(drive_db) * crackle
        dull[round(s * SR) + after] += from_db(drive_db + dull_db) * crackle
    both = 1.4 * resonance_twice(bright, 7000, 3600) + 1.2 * resonance_twice(dull, 1800, 2700)
    return filtered(both, 4, 11500)


@njit
def moving_resonance(x, hz, width_hz, rate):
    """Two-pole peak of gain 1, twice, whose centre moves."""
    r = np.exp(-np.pi * width_hz / rate)
    for _ in range(2):
        y = np.zeros(len(x))
        for i in range(2, len(x)):
            driven = (x[i] - x[i - 2]) * (1 - r * r) / 2
            y[i] = driven + 2 * r * np.cos(2 * np.pi * hz[i] / rate) * y[i - 1] - r * r * y[i - 2]
        x = y
    return x


def hoarse_cry():
    """Uneven slaps and air ring in the mouth; jaw and tongue shift its resonances and their weight."""
    at, fade, (level_db, jaw) = played(RASP, fade_s=0.0029)
    t, size, jaw = at / SR, len(at), np.clip(jaw, 0, 1)
    fold_s, fold_rate, fold_irregular = np.transpose(FOLDS)
    per_s, irregular = np.interp(t, fold_s, fold_rate), np.interp(t, fold_s, fold_irregular)
    air = BREATHY * irregular ** 2 * from_db(2.4 * drift(120, size)) * rng.standard_normal(size)
    train = slaps(per_s, irregular) + air
    tongue = np.interp(t, *np.transpose(TONGUE))
    voice = 0
    for k, (hz, width_hz, wide_db, narrow_db) in enumerate(MOUTH):
        centre = hz * (tongue if hz < TONGUE_BELOW_HZ else 1) * (1 + 0.012 * drift(13, size))
        rung = moving_resonance(train, centre, 1.37 * width_hz, SR)
        gain = from_db(jaw * wide_db + (1 - jaw) * narrow_db + 2.3 * drift(15.5, size))
        voice = voice + (-1) ** k * gain * rung   # neighbours in opposite sign
    voice = filtered(voice - .9 * resonance(voice, CRY_HOLLOW_HZ, 500), 6, CRY_TOP_HZ)
    out = np.zeros(N)
    out[at] = from_db(level_db) * fade * rms_one(voice)
    return out


def room(x):
    """Echo tail: noise that dies band by band, more alike in both ears toward the bass."""
    t = np.arange(int(.7 * SR)) / SR
    tail, edges = 0, 100 * 2 ** np.arange(0, 8.)
    for low, high in zip(edges, edges[1:]):
        band = filtered(wide_noise(1 / (1 + low / 900), len(t)), 2, [low, high], "band")
        tail = tail + band * from_db(-60 * t / at_hz(ROOM_T60, np.sqrt(low * high)))
    tail = tail * np.clip((t - .004) / 0.00057, 0, 1)   # the first echo comes after 4 ms
    tail = tail * np.exp(-(t / 0.41) ** 2)   # the tail's level drops ever faster the longer it lasts
    tail = tail / np.sqrt(np.mean(np.sum(tail ** 2, axis=1)))
    return signal.fftconvolve(x[None], tail, axes=1)[:, :N]


def placed(x, left_lag, balance_db):
    """The sound reaches the left port later by left_lag samples; balance is left minus right."""
    left = np.interp(np.arange(N) - left_lag, np.arange(N), x)
    return np.array([left * from_db(balance_db / 2), x * from_db(-balance_db / 2)])


def placed_bass(x):
    """The left port stands nearer the bed; the lowest rumble is not picked up."""
    return filtered(x * from_db([[1.2], [-1.2]]), 2, 42, "high")


def scene():
    """Puppy near, clock far, both in the room."""
    soft = whimpers() + creaks() + smacks() + snaps() + nostril()
    # a tiny body radiates no bass
    soft, loud, puff = filtered(np.array([soft, hoarse_cry(), sneeze()]), 3, 170, "high")
    head_db, tick = np.interp(np.arange(N) / SR, *np.transpose(HEAD)), clock()
    shaded = placed(puff, 4.9, head_db)
    shaded[0] = filtered(shaded[0], 2, 9000)   # the left port is shaded from the sneeze's treble
    near = placed(soft, 3.65, head_db) + from_db(-1.5) * placed(loud, 1.33, head_db) + shaded
    direct = near + placed(tick, 1.33, 0.6)
    to_room = from_db(-9.0) * soft + from_db(-12.0) * puff + from_db(-6.0) * loud
    to_room = to_room + from_db(-4.0) * resonance(tick, 3600, 2600)
    return direct + room(to_room) + placed_bass(bedding() + room_tone())


def record(dry):
    """The microphone ports weaken a narrow band; the top is cut."""
    ported = dry - 0.15 * resonance(dry, 6300, 610)
    return signal.sosfilt(signal.cheby2(12, 60, CUTOFF_HZ, fs=SR, output="sos"), ported)


dry = scene()
out = record(dry)
persist_wave(out)
```